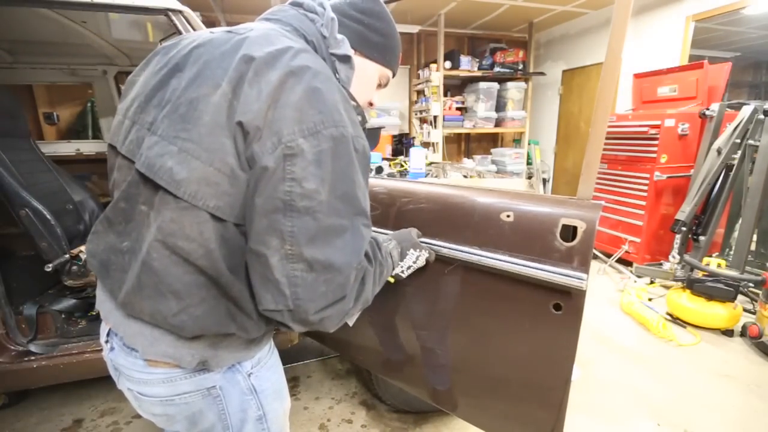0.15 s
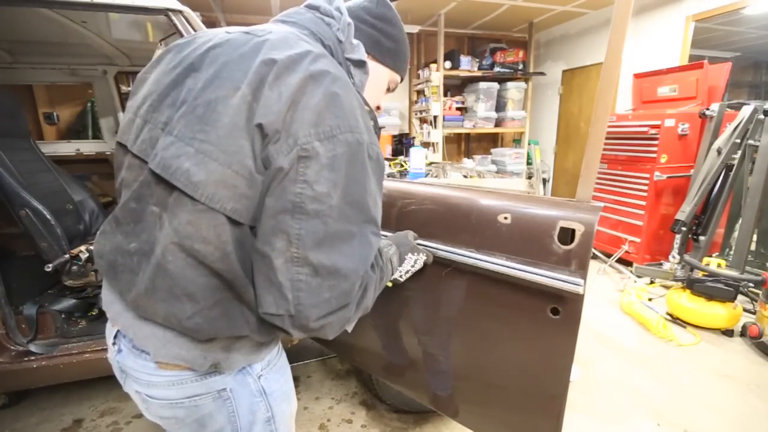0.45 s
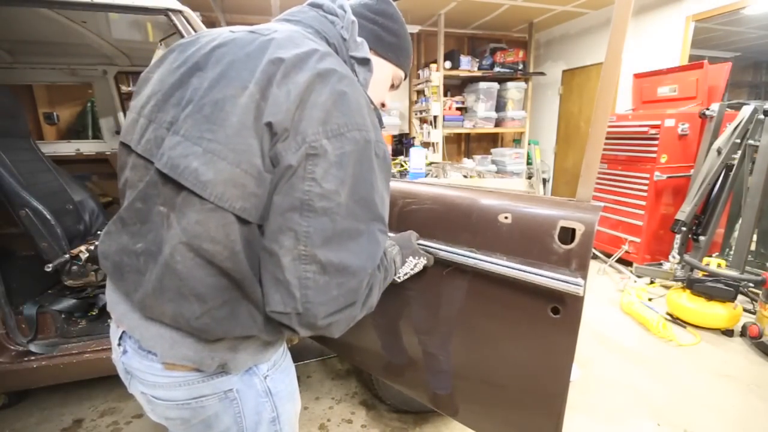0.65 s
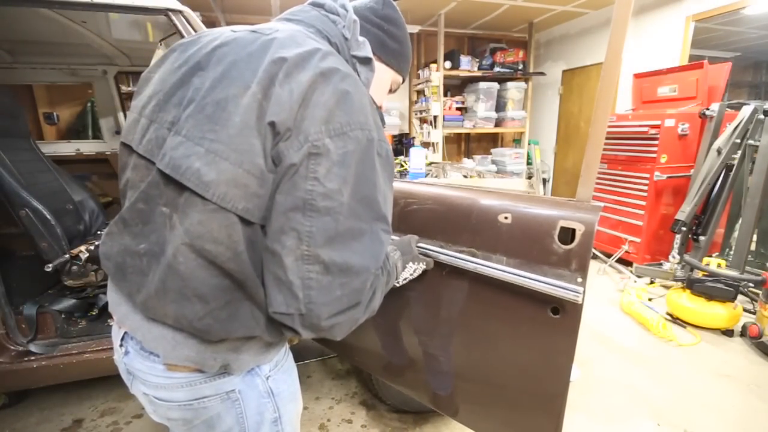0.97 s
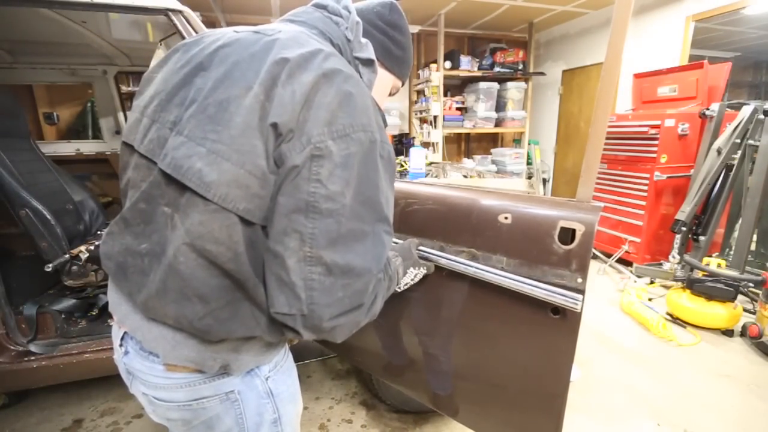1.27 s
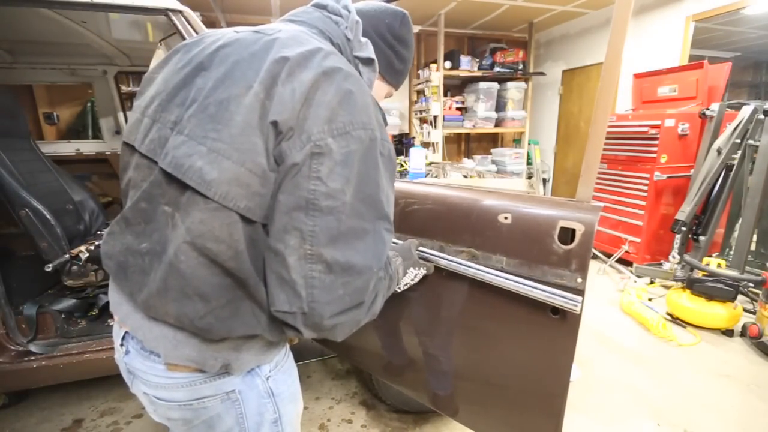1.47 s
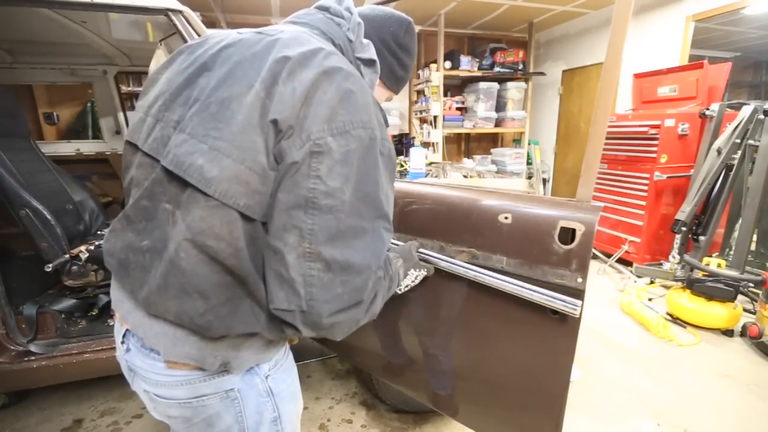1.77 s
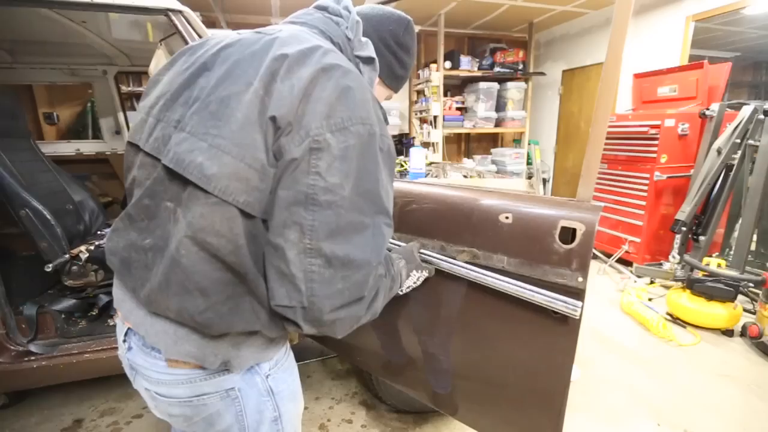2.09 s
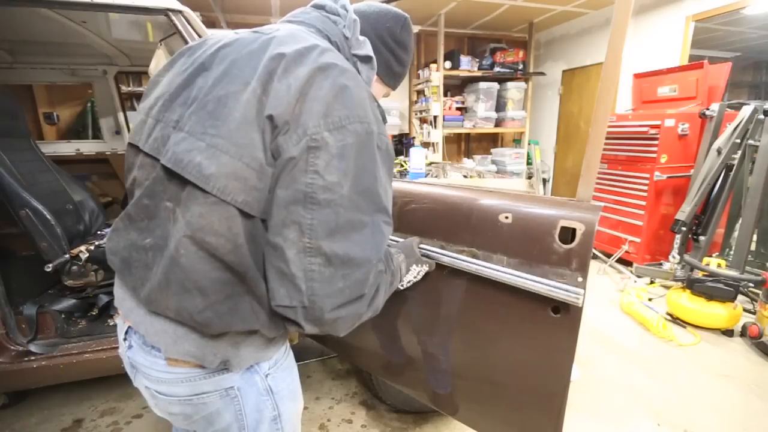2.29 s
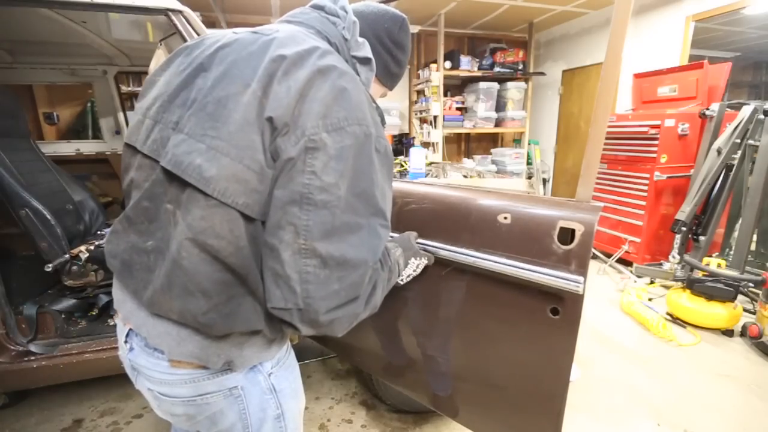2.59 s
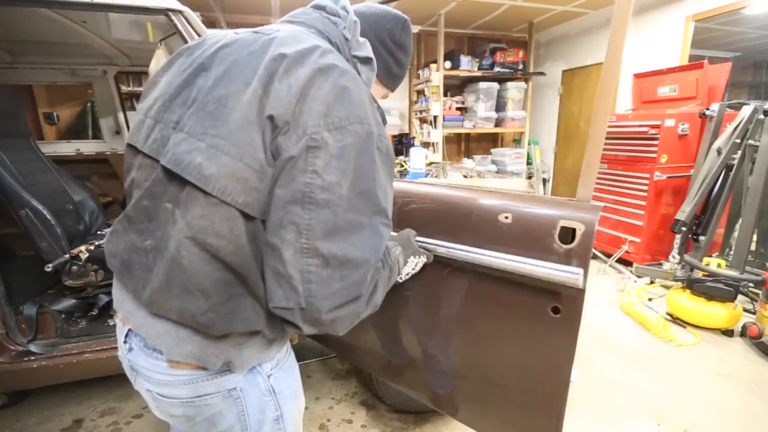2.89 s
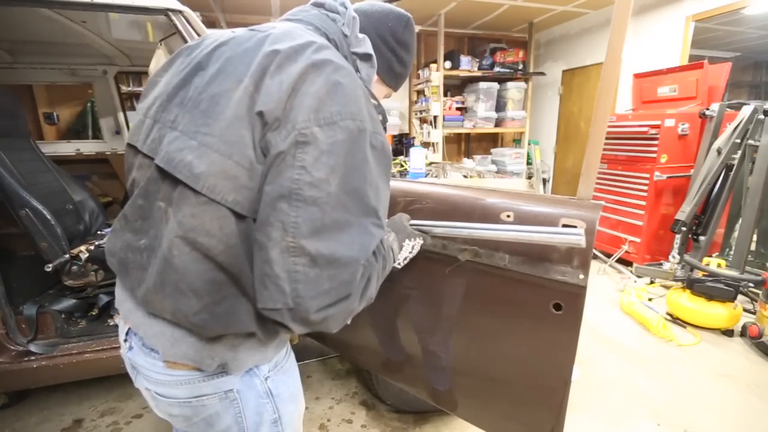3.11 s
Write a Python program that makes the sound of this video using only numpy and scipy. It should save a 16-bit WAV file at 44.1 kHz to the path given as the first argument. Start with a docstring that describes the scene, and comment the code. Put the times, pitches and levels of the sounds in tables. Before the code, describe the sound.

A metal trim strip is pried off a hollow car door, heard close in an echoing garage. Over low steady hum and faint cloth rustle, clacks come at 0.2 and 0.6 s, scrapes near 0.9. Faint ticks follow, one with a small ring at 1.26. A strong ringing clank lands at 1.8, then lighter ticks; from 2.4 snaps and rattling scrapes crowd together, strongest around 2.75, 2.95 and 3.24.

```python
"""A low steady hum and a faint rustle come first, then scrapes and sharp snaps in a hard-walled garage.
A metal trim strip is levered off a car door: the tool sticks and slips (clicks of noise under friction),
and clips let go (short bursts of noise). The door panel, the strip and once the lever ring on as fading tones.
The jacket is shaped noise that swells and thins; decaying noise in many bands makes the room's echo."""
import sys
import numpy as np
from scipy import signal
from scipy.fft import rfft, irfft
from scipy.io import wavfile
from scipy.ndimage import uniform_filter1d

SR = 44100
rng = np.random.default_rng(int(sys.argv[2]) if len(sys.argv) > 2 else 0)


def master(y):
    """Save y as 16-bit WAV."""
    cut = np.clip(np.atleast_2d(y).T, -1, 1)
    pcm = np.round(cut * 32767)  # scale
    wavfile.write(sys.argv[1], SR, pcm.astype(np.int16))


N = 143325  # length of the scene in samples


def undb(db):
    """Turn decibels into an amplitude factor."""
    return 10 ** (np.asarray(db) / 20)


def unit(x):
    """Scale a sound to an rms of 1."""
    return x / np.sqrt(np.mean(x ** 2) + 1e-20)


def add(out, start, x):
    """Mix x into out from the given second on."""
    i = int(np.clip(start * SR, 0, N - 1))
    out[i:i + len(x)] += x[:N - i]


def gain_curve(points):
    """Gain at every frequency, drawn through (f/Hz, level/dB) points on a log frequency axis."""
    hz, db = np.array(points).T
    f = np.maximum(np.fft.rfftfreq(N, 1 / SR), 1)
    return undb(np.interp(np.log(f), np.log(hz), db))


def noise(points):
    """White noise is shaped by the points, then brought to an rms of 1."""
    white = rfft(rng.standard_normal(N))
    return unit(irfft(white * gain_curve(points), N))


# spectrum of the room air: f/Hz, relative level/dB per Hz
AIR_SPECTRUM = [(15, -48.5), (25, -5), (91, -12), (122, -8.5), (193, 1), (227, -11), (349, -6.5),
                (433, -13.5), (509, -13), (598, -10.5), (684, -15.5), (782, -11), (970, -18), (1570, -34.5),
                (3000, -43), (5430, -65), (15500, -34.5)]
# steady hum tones: f/Hz, level/dB before HUM_DB
HUM_TONES = [(118.4, -53), (220.7, -53), (436.0, -54.5), (769.8, -57.5)]
AIR_DB, HUM_DB = -46, -2


def background():
    """Room air is steady shaped noise; the hum is a sum of steady sine tones."""
    t = np.arange(N) / SR
    hum = 0
    for hz, db in HUM_TONES:
        hum = hum + undb(db) * np.sqrt(2) * np.sin(2 * np.pi * (hz * t + rng.random()))
    return undb(AIR_DB) * noise(AIR_SPECTRUM) + undb(HUM_DB) * hum


# loudness of the jacket's rustle as the arms move: t/s, level/dB
RUSTLE_LEVEL = [(0, -52), (.3, -51.5), (.41, -46), (.5, -45.5), (.58, -49.5), (.75, -53), (1.1, -52),
                (1.4, -56.5), (2.3, -55.5), (2.6, -48.5), (3.25, -46.5)]
# spectrum of the brushing cloth: f/Hz, relative level/dB per Hz
CLOTH_SPECTRUM = [(500, -24.5), (2000, 6), (4000, 5.5), (6000, 1), (9000, 0.5), (15000, -3.5)]
GRAIN_DB = 1.0  # rms size of the quick level changes


def jacket():
    """Coarse cloth brushes as the arms move: shaped noise with a slow swell and a fine grain."""
    t = np.arange(N) / SR
    grain = unit(uniform_filter1d(rng.standard_normal(N), size=200))
    swell_db = np.interp(t, *np.array(RUSTLE_LEVEL).T)
    return noise(CLOTH_SPECTRUM) * undb(swell_db + GRAIN_DB * grain)


# echo of the garage: f/Hz, time to fade by 60 dB t/s, reverberant level/dB
GARAGE_ECHO = [(150, 0.588, 9), (400, 0.845, 3.5), (943, 0.819, 0), (1389, 0.516, -1), (2500, 0.582, -7),
               (4200, 0.526, -6), (7020, 0.51, -9.5), (13900, 0.107, -27)]
ROOM_DELAY_S, ROOM_BUILD_S = 0.001854, 0.00167  # wait before the echo, time constant of its rise


def garage(x):
    """Dense reflections off walls and shelves: noise in 17 bands, each fading at its own speed."""
    t = np.arange(SR) / SR
    hz, t60, db = np.array(GARAGE_ECHO).T
    edges = np.geomspace(60, 18000, 18)
    f = np.fft.rfftfreq(SR, 1 / SR)
    white = rfft(rng.standard_normal(SR))
    build = 1 - np.exp(-np.maximum(t - ROOM_DELAY_S, 0) / ROOM_BUILD_S)
    tail = 0
    for lo, hi in zip(edges, edges[1:]):
        middle = np.log(lo * hi) / 2  # log of the band's centre frequency
        band_t60 = np.interp(middle, np.log(hz), t60)
        band_db = np.interp(middle, np.log(hz), db)
        fade = np.exp(-np.log(1000) * t / band_t60)
        part = irfft(white * (f >= lo) * (f < hi), SR) * build * fade
        tail = tail + unit(part) * undb(band_db) * np.sqrt(2 * (hi - lo)) / SR
    return signal.fftconvolve(x, tail)[:N]


# colour that the strip and door give to every contact: f/Hz, level/dB
BODY_COLOUR = [(80, -6.5), (150, -17), (220, 2), (255, -6.5), (340, 1.5), (450, -3.5), (550, -3), (760, 5),
               (950, 4.5), (1150, -4.5), (1400, -4), (1650, 1), (2300, 4), (3100, 1), (4200, 2.5),
               (5000, -2.5), (5800, -1), (6800, -1), (9000, -1), (11000, -1.5), (13000, -5), (16000, -7)]


def body(x):
    """The strip and door favour some frequencies: a filter that responds as early as it can."""
    cepstrum = irfft(np.log(gain_curve(BODY_COLOUR)), N)
    cepstrum[1:] *= 2  # with the second half dropped, this gives minimum phase
    response = irfft(np.exp(rfft(cepstrum[:N // 2], N)), N)
    return signal.fftconvolve(x, response[:SR // 10])[:N]


# quickly damped resonances of the clamped strip: f/Hz, width f/Hz, level/dB before CLANG_DB
CLAMPED_STRIP = [(917, 46.4, -7), (1593, 15, -2.5), (2258.6, 20, -12.5), (2520.4, 31, -0.5),
                 (2718, 18.3, -7.5), (3061, 69.5, -4.5), (3230, 125, 0.5), (3498, 180, -4), (3894, 69.4, 3),
                 (3997, 16.7, -9), (4217, 85, -2.5), (4599, 79, -10), (5404, 136, -9.5), (7712, 154, -8.5),
                 (8725, 73, -9.5), (9875, 65, -17), (12310, 273, 1), (14270, 230, 3.5)]
DRY_DB, CLANG_DB = -3, -3  # share of the plain contact and of the resonances


def clang(x):
    """Contacts pass through the strip's narrow resonances and turn metallic."""
    rung = 0
    for hz, width, db in CLAMPED_STRIP:
        b, a = signal.iirpeak(hz, hz / width, fs=SR)
        rung = rung + undb(db) * signal.lfilter(b, a, x)
    return undb(DRY_DB) * x + undb(CLANG_DB) * rung


# borders of the bands thud, knock, clank, clack, tick, fizz: f/Hz
BAND_EDGES = [130, 500, 1400, 2800, 4900, 9500, 15800]
# overall level of each of the six bands, added to every contact's own: level/dB
BAND_LEVELS = [2.5, 1.5, 0, -0.5, 1, 0.5]


def voiced(force, dbs, length):
    """Give a contact its colour: each of the six bands has its own level, counted over length seconds."""
    out = 0
    for lo, hi, db, overall_db in zip(BAND_EDGES, BAND_EDGES[1:], dbs, BAND_LEVELS):
        band_pass = signal.butter(3, [lo, hi], "band", fs=SR, output="sos")
        out = out + unit(signal.sosfilt(band_pass, force)) * undb(db + overall_db)
    return out * np.sqrt(length * SR / len(force))


# scrapes and buzzes of the strip against the tool and the door: start t/s, length t/s,
# then level/dB of thud, knock, clank, clack, tick, fizz before the overall band levels and colouring
SCRAPE_EVENTS = [(0.149,0.0636,-47,-51.5,-46,-46.5,-46.5,-50), (0.577,0.013,-66,-44,-43,-31,-39,-52.5),
                 (0.845,0.0317,-60.5,-39.5,-41.5,-35,-35,-28), (0.886,0.034,-35.5,-36.5,-34.5,-34,-40,-33),
                 (0.913,0.0148,-49,-35,-27,-27.5,-33.5,-30), (1.826,0.1323,-39,-39,-46.5,-44.5,-51.5,-55.5),
                 (2.332,0.0682,-65,-51.5,-55.5,-49,-50.5,-47), (2.399,0.0226,-34.5,-46,-42,-35,-41,-44),
                 (2.426,0.0661,-35.5,-32.5,-35,-33.5,-37.5,-40),
                 (2.464,0.0873,-38.5,-41,-34,-37.5,-43.5,-54.5), (2.61,0.064,-43,-70,-55.5,-64.5,-57,-53),
                 (2.719,0.02507,-29.5,-35,-26,-20.5,-27,-31.5),
                 (2.755,0.01803,-22.5,-29.5,-21,-19,-26.5,-26), (2.94,0.0091,-54,-43,-32.5,-30,-43.5,-45),
                 (2.952,0.0074,-55.5,-47,-29,-22,-22,-13), (2.974,0.0416,-44.5,-37.5,-26,-25,-28,-32),
                 (2.998,0.0315,-35,-23.5,-26.5,-36,-43.5,-52.5),
                 (3.017,0.0812,-39,-38,-33.5,-38.5,-42.5,-45)]
SLIPS_PER_S, SLIP_SPREAD_DB, SLIP_S = 1800, 5.5, 0.00085  # average rate, unevenness, fade time constant
RUB_POWER = undb(-3.5)  # steady friction between the slips, added as power
SCRAPE_EDGE = 0.177  # share of the length spent fading in, and again fading out


def scrapes():
    """Metal sticks and slips in a quick run of uneven clicks over steady friction."""
    out = np.zeros(N)
    t = np.arange(SR // 6) / SR
    for start, length, *dbs in SCRAPE_EVENTS:
        slip_now = rng.random(len(t)) < SLIPS_PER_S / SR
        slips = slip_now * undb(SLIP_SPREAD_DB * rng.standard_normal(len(t)))
        slip_power = signal.lfilter([1], [1, -np.exp(-2 / (SLIP_S * SR))], slips ** 2)
        grip = np.sqrt(slip_power + RUB_POWER)
        press = np.clip(np.minimum(t, length - t) / (SCRAPE_EDGE * length), 0, 1)
        force = grip * press * rng.standard_normal(len(t))
        add(out, start, voiced(force, dbs, length))
    return out


def ring(modes, flutter):
    """One second of fading tones with random signs; each flutters as the loose parts touch."""
    t = np.arange(SR) / SR
    flutter_t = np.linspace(0, 1, 100)
    out = 0
    for hz, db, t60 in modes:
        waver = 1 + flutter * np.interp(t, flutter_t, rng.standard_normal(100))
        tone = rng.choice([-1, 1]) * np.sin(2 * np.pi * hz * t)
        out = out + undb(db) * waver * tone * np.exp(-np.log(1000) * t / t60)
    return out


# tones of the hollow door panel: f/Hz, relative level/dB, time to fade by 60 dB t/s
DOOR_MODES = [(83.2, -17, 1), (189.3, -35.5, 0.84), (224.25, -6.5, 1), (281.5, -5, 1), (349.64, 0.5, 0.217),
              (473.6, 4, 0.39), (699, -13, 1), (738.4, -24, 0.3), (877, -12, 0.53), (843, -39, 1),
              (934, -14.5, 0.27)]


def door_ring():
    """The hollow door panel rings in its own low tones."""
    return ring(DOOR_MODES, flutter=0.71)


# tones of the metal strip: f/Hz, relative level/dB, time to fade by 60 dB t/s
STRIP_MODES = [(454.75, -2, 0.68), (873.1, 1.5, 0.584), (1211, -5.5, 0.455), (1744, -14, 0.29),
               (2240, -6.5, 0.44), (2450, -11, 0.26), (2880, -29, .4), (3630, 0, 0.19), (3920, -16, 0.28),
               (4025, -8, 0.58), (4093, -5, 0.714), (3900, -6, 0.49), (4350, 1.5, 0.38), (5040, -7.5, 0.24),
               (5630, -8.5, .25), (6250, -7.5, 0.29)]


def strip_ring():
    """The strip rings in mostly higher tones that flutter strongly."""
    return ring(STRIP_MODES, flutter=1.47)


# tones of the lever: f/Hz, relative level/dB, time to fade by 60 dB t/s
LEVER_MODES = [(1905, -7, 0.443), (3290, -4, 0.114), (4220, -10.5, 0.22), (6000, -12, 0.128)]


def lever_ring():
    """The lever rings in four tones that flutter gently."""
    return ring(LEVER_MODES, flutter=0.25)


def burst(shape):
    """Noise under an envelope, evened out to hold all frequencies alike."""
    spectrum = rfft(shape * rng.standard_normal(len(shape)), 2 * len(shape))
    return irfft(np.exp(1j * np.angle(spectrum)))[:len(shape)]


# snaps of the strip and its clips: t/s, then level/dB of thud, knock, clank, clack, tick, fizz
# before the overall band levels and colouring, then door ring and strip ring as level/dB
# applied to the tones above
SNAP_EVENTS = [(0.1863,-53,-39.5,-31.5,-31.5,-46.5,-63.5,-83,-74),
               (0.2462,-32.5,-33.5,-24,-22,-32,-39,-36,-47.5),
               (0.5857,-37.5,-31.5,-20,-18,-27,-33.5,-42.5,-38.5),
               (1.082,-50,-59.5,-50,-48.5,-54.5,-50.5,-79,-82),
               (1.2185,-60,-51.5,-50.5,-48,-54.5,-52,-76.5,-73.5),
               (1.2624,-55.5,-50,-40,-39,-47,-43.5,-74.5,-58.5),
               (1.485,-58.5,-75.5,-58,-59.5,-56,-55.5,-80,-64),
               (1.6513,-48.5,-71,-66,-62.5,-59.5,-55,-79.5,-67.5),
               (1.6973,-54,-55,-57.5,-55,-66,-72.5,-80,-78.5),
               (1.8193,-25.5,-24.5,-24,-20,-24,-32.5,-47.5,-31),
               (2.0467,-49,-60,-48,-42,-41.5,-42.5,-74.5,-59),
               (2.1583,-54.5,-48,-48,-38.5,-41,-44,-51.5,-64),
               (2.4126,-39,-25,-22.5,-25,-46.5,-42,-58,-46.5), (2.421,-59,-35,-30,-18,-25,-26.5,-37.5,-42),
               (2.68,-55,-58,-53.5,-50,-51,-45,-73.5,-65.5), (2.735,-26.5,-27.5,-28,-24,-51,-46,-44.5,-50),
               (2.7521,-25,-30.5,-37.5,-24.5,-23.5,-23,-27.5,-44),
               (2.9484,-54.5,-27.5,-22,-18.5,-20.5,-23.5,-61,-41.5),
               (2.991,-35,-33,-35,-28.5,-47,-22.5,-60.5,-62),
               (3.1467,-45,-37,-37.5,-33.5,-43,-41.5,-72.5,-54.5),
               (3.171,-42.5,-38,-36.5,-47.5,-44,-43.5,-65.5,-46.5),
               (3.2435,-42.5,-34,-30,-16,-18,-19,-58.5,-44)]
CRACK_S, CHATTER_S, CHATTER_DB = 0.001337, 0.00852, 0.5  # fade times of break and buzz, buzz against break
SNAP_S = 0.02522  # time over which a snap's level is counted
LEVER_S, LEVER_DB = 1.2622, -34.5  # when and how strongly the lever rings


def snaps():
    """Each release is a crack and a short buzz; the door, the strip and once the lever ring on."""
    cracks, door, metal = np.zeros((3, N))
    t = np.arange(SR // 8) / SR
    shape = np.exp(-t / CRACK_S) + undb(CHATTER_DB) * np.exp(-t / CHATTER_S)
    door_tones, strip_tones = door_ring(), strip_ring()
    for start, *dbs, door_db, strip_db in SNAP_EVENTS:
        add(cracks, start, voiced(burst(shape), dbs, SNAP_S))
        add(door, start, undb(door_db) * door_tones)
        add(metal, start, undb(strip_db) * strip_tones)
    add(metal, LEVER_S, undb(LEVER_DB) * lever_ring())
    return cracks, door, metal


DOOR_ROOM_DB, STRIP_ROOM_DB = -11, -11  # share of each ring that reaches the walls


def scene():
    """The work on the door, its echo in the garage, the jacket and the hum together."""
    cracks, door, metal = snaps()
    contact = clang(body(cracks + scrapes()))
    room = garage(contact + undb(DOOR_ROOM_DB) * door + undb(STRIP_ROOM_DB) * metal)
    return (background() + jacket() + room + contact + door + metal)[None]


DRIVE, TOP_HZ = 0.267, 15900  # strength of the rounding, upper limit of the treble


def record(dry):
    """Round the highest peaks softly and cut the top of the treble."""
    rounded = np.tanh(DRIVE * dry) / DRIVE
    low_pass = signal.ellip(8, .2, 70, TOP_HZ, fs=SR, output="sos")
    return signal.sosfilt(low_pass, rounded)


dry = scene()
out = record(dry)
master(out)
```